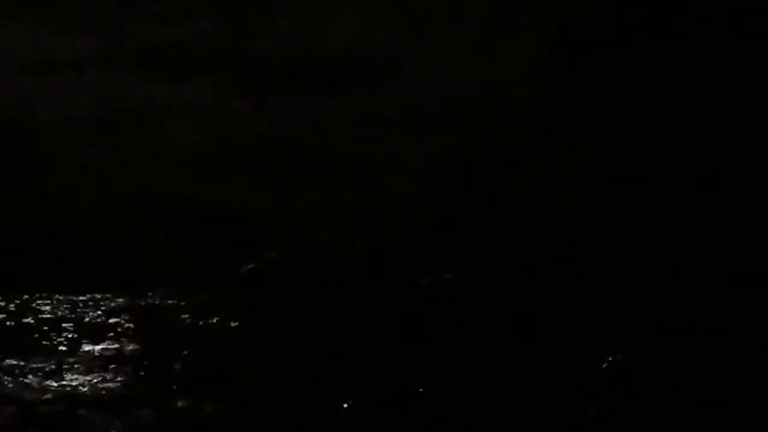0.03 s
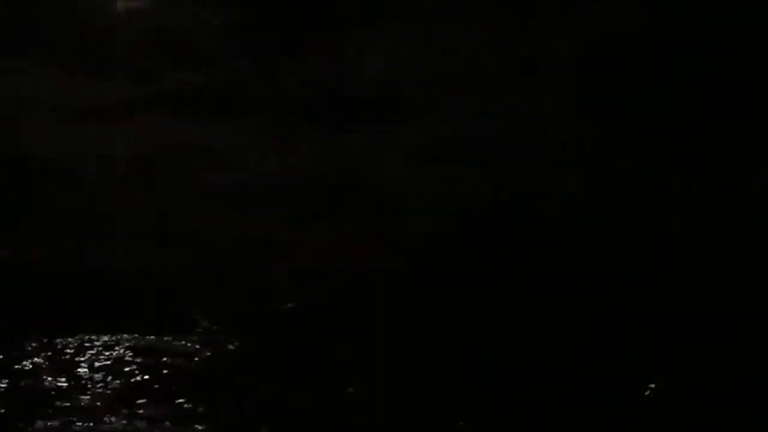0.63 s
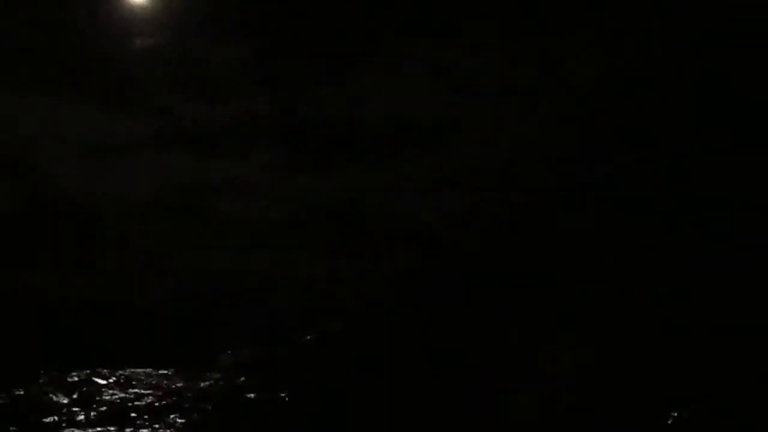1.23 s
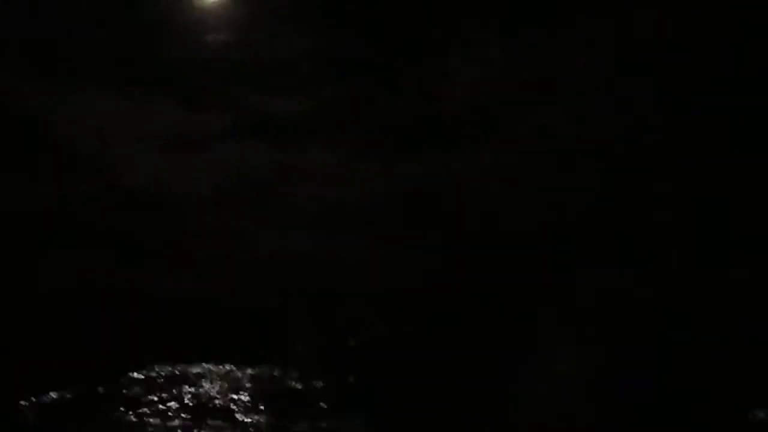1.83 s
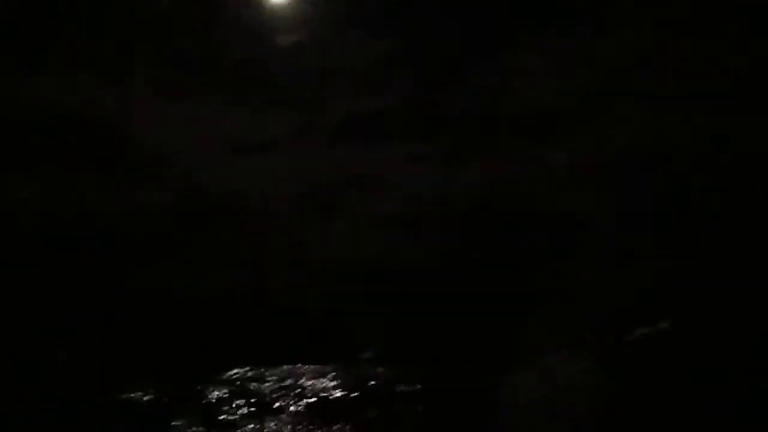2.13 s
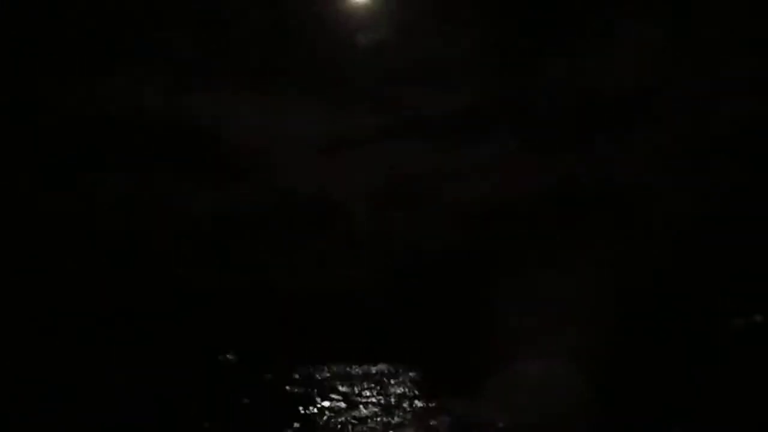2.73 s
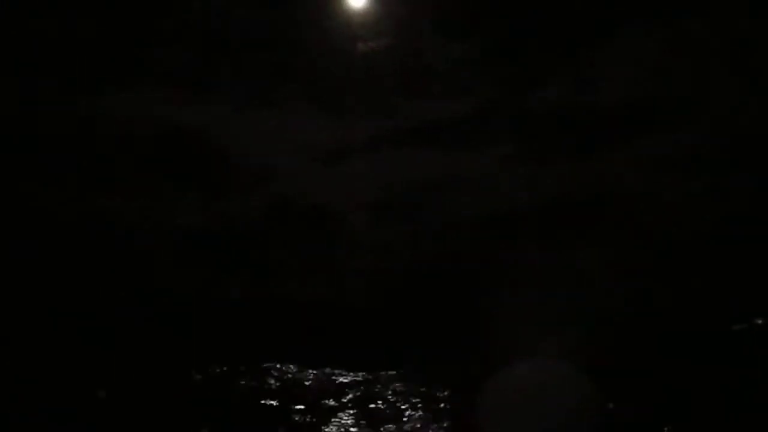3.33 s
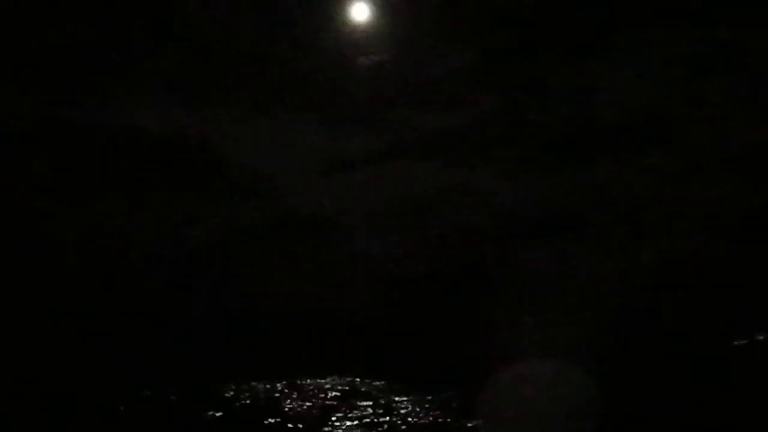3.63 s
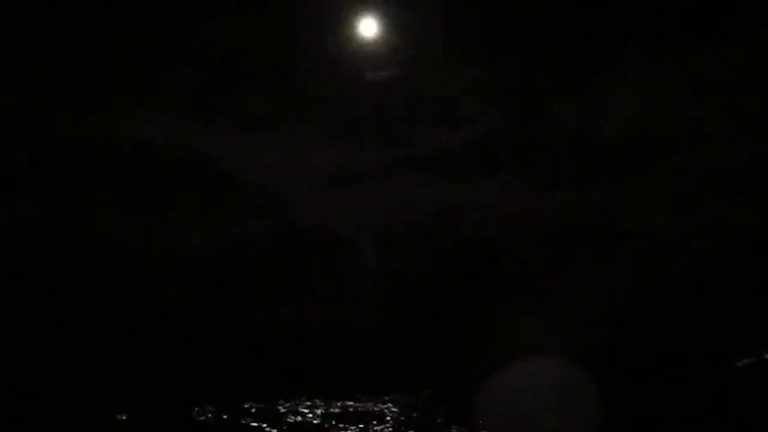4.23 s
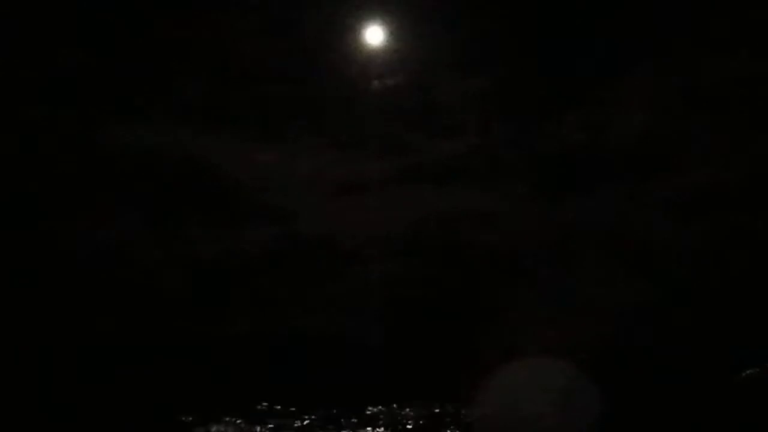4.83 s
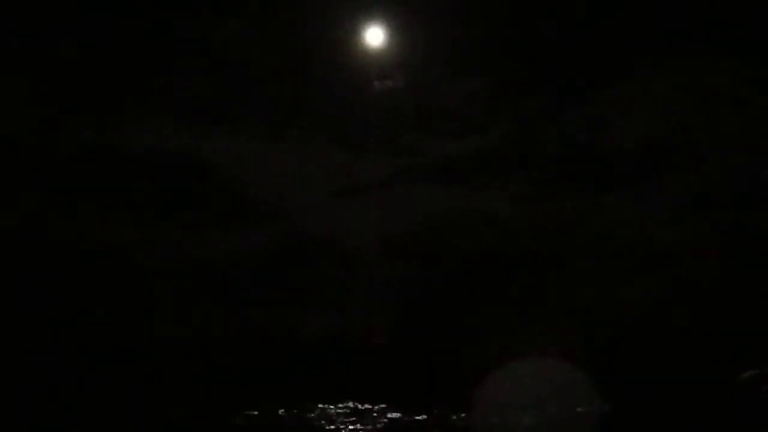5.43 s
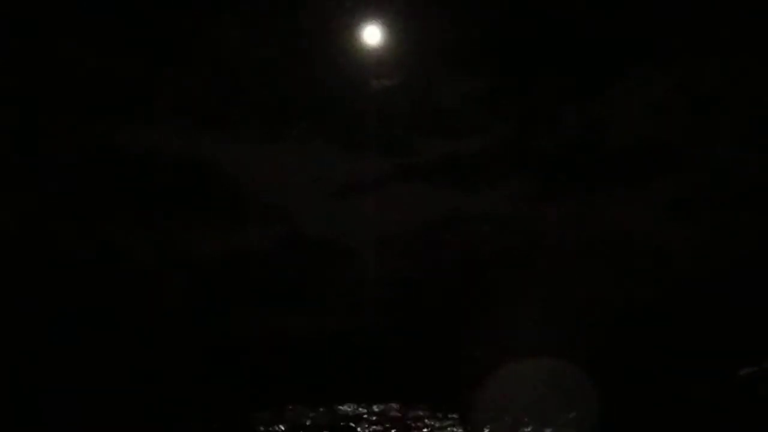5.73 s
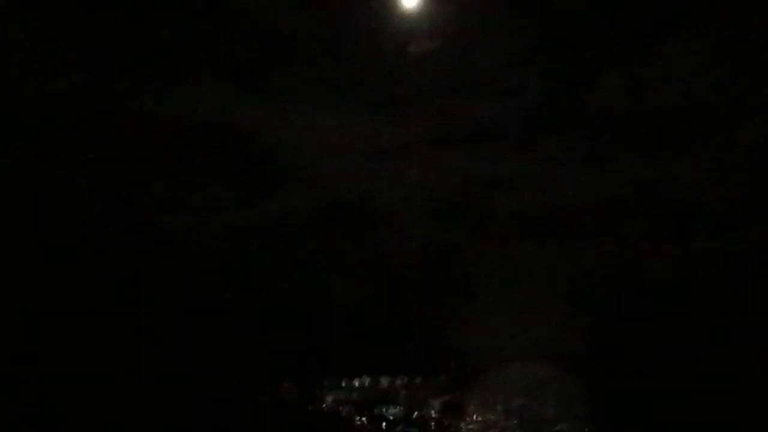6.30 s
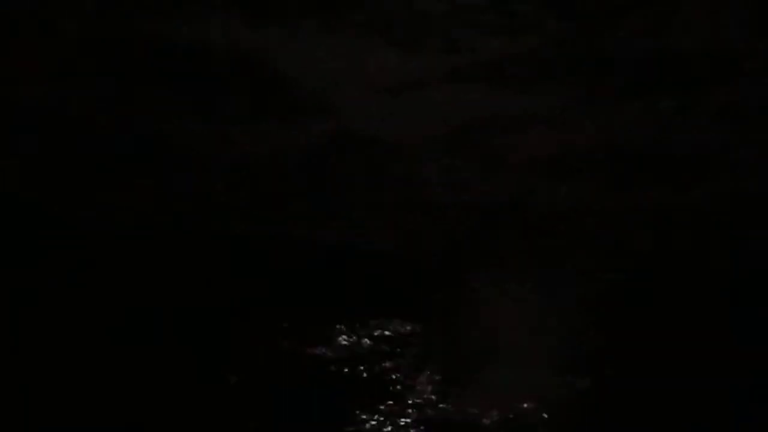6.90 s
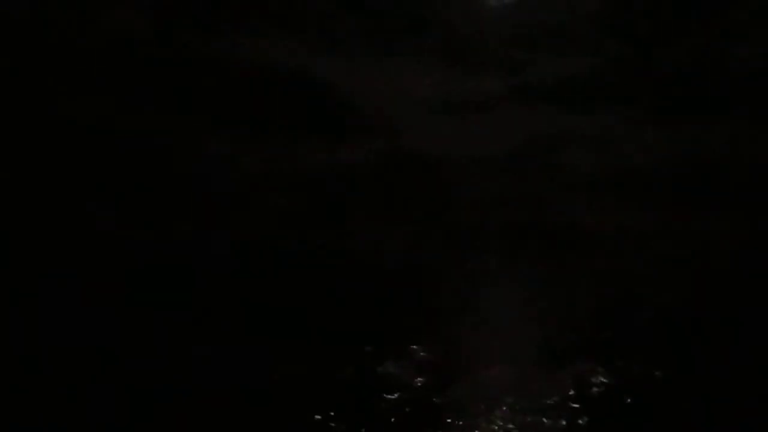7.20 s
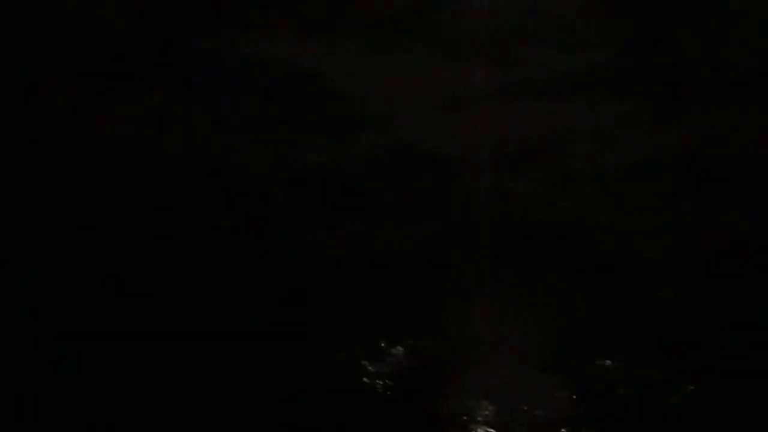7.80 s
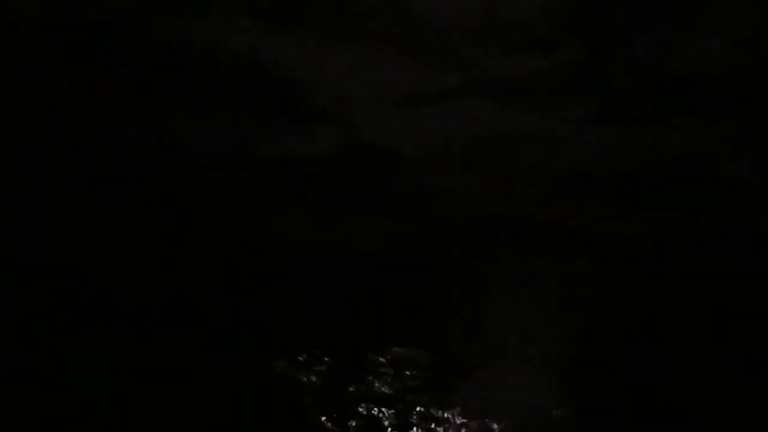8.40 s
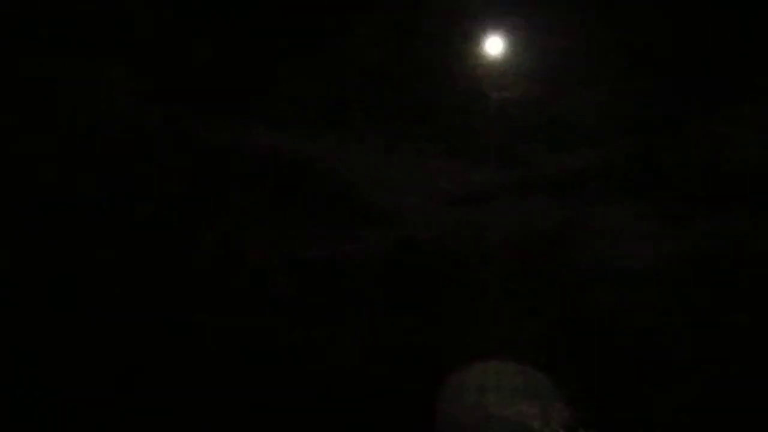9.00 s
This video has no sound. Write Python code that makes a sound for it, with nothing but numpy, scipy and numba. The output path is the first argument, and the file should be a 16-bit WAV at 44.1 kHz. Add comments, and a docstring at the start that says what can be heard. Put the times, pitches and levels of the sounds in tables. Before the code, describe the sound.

Close, gentle waves lap and wash on a seashore, bubbling and hissing over the low roar of distant surf. The wash eases, then a wave breaks with several sharp slaps and a churning gurgle. It drains off, and another wave rolls in with plops and spray, ending in a sustained foamy rush. The sound is near and out in the open, without echo.

```python
"""Small waves on a night shore

Waves run up a few steps away, with surf rumbling behind. One slaps down hard and drains away, the
next spills over in a long rush. The water sounds through its air: big pockets churn, bubbles
gurgle and plop, foam seethes and spray fizzes."""
import sys
import numpy as np
from scipy import signal
from scipy.fft import rfft, irfft, next_fast_len
from scipy.io import wavfile
from scipy.ndimage import uniform_filter1d, minimum_filter1d
from numba import njit

SR = 44100
rng = np.random.default_rng(int(sys.argv[2]) if len(sys.argv) > 2 else 0)


def dump_mix(stems):
    """Bounce the given channels to the path in sys.argv[1] as a 16-bit WAV at rate SR."""
    frames = np.atleast_2d(stems).T  # one column per channel
    limited = np.clip(frames, -1, 1)  # hard clip at full scale
    pcm = np.round(limited * 32767).astype(np.int16)
    wavfile.write(sys.argv[1], SR, pcm)


N = 403515
T = np.arange(N) / SR

# tone of the surf (low), gurgle (mid) and foam (high), including the microphone's resonance
# near 1410 Hz: (frequency [Hz], relative level [dB])
LOW_TONE = [(15, -19), (25, -26), (64, -26), (130, -17), (220, -13), (340, -8.5), (450, -7), (560, -5),
            (660, -6), (780, -10), (900, -14.5)]
MID_TONE = [(900, -11.5), (1040, -6), (1150, -6), (1290, -0.5), (1410, 2), (1620, -3), (1830, -2.5),
            (2080, -6.5), (2400, -13.5)]
HIGH_TONE = [(1800, -11), (2400, -14), (2900, -13), (3650, -12), (4800, -13.5), (5600, -17.5),
             (6600, -23.5), (7500, -23.5), (8400, -22), (9900, -22), (11400, -27), (12300, -28),
             (14300, -31), (15600, -42)]


def swash():
    """The running sheet of water gurgles, seethes and fizzes; each little tumble lifts all three."""
    gurgle_db = wave_swell("gurgle", calm_db=-34.5)
    foam_db = wave_swell("foam", calm_db=-38.5, linger=1.15)
    spray_db = wave_swell("spray", calm_db=-48, linger=1.36)
    tumble = 0.3 * wander(24) + 0.55 * wander(80)
    gurgle = bubble_cloud(911, 2448, count=7000, cycles=32, spread_db=2.5, blur_db=11.5)
    gurgle = colour(gurgle, MID_TONE, 720, 2280, order=20)
    foam = bubble_cloud(2190, 7030, count=8000, cycles=28.6, spread_db=3, blur_db=7.5)
    foam = colour(foam, HIGH_TONE, 2050, 6070)
    foam += undb(-10.5) * spatter(count=1400, spread_db=2.5)
    spray = bubble_cloud(5480, 16500, count=16000, cycles=14, spread_db=3.5, blur_db=2)
    spray = colour(spray, HIGH_TONE, 7320, 20000)
    return (gurgle * undb(gurgle_db + tumble + 0.58)
            + foam * undb(foam_db + 1.12 * tumble)
            + spray * undb(spray_db + 1.5 * tumble + 0.42 * wander(45) + 1.36))


def wave_swell(layer, calm_db, linger=1):
    """One layer's envelope in dB: waves swell, hold and drain; linger stretches rise and drain."""
    # waves and laps reaching the shore: (crest [s], base rise [s], hold [s], base drain [s],
    # gurgle [dB], churn [dB], foam [dB], spray [dB])
    waves = [(0.017, 0.18, .18, 0.73, -25.5, -34.5, -33, -37.5),
             (0.995, 0.99, 0.18, 1.7, -33, -38, -42.5, -39.5),
             (3.243, 0.2, .03, .3, -32.5, -41, -37.5, -50), (3.7, 0.42, 0.45, 0.094, -33, -39, -34.5, -51),
             (5.12, 0.043, 0.21, 0.54, -35, -51, -38, -54),
             (5.617, 0.057, 0.27, 0.17, -17.5, -25.5, -21, -30),
             (5.757, .03, 0.17, 0.1, -24, -22.5, -36, -44),
             (6.208, 0.069, 0.14, 0.14, -25.5, -37, -28.5, -37),
             (6.497, 0.11, 0.087, 0.17, -27, -47, -32.5, -41.5),
             (7.752, 0.26, 0.29, 0.28, -21, -36.5, -25, -32.5),
             (7.878, 0.032, .14, .09, -22, -38, -34, -46), (8.125, 0.085, .04, 0.15, -23, -32.5, -26, -38),
             (8.316, .05, 0.041, 0.23, -24, -38, -25, -41.5), (8.69, 0.36, 0.092, 2.9, -25, -49, -31, -40)]
    column = ("gurgle", "churn", "foam", "spray").index(layer)
    power = undb(calm_db) ** 2  # the wash that never stops between waves
    for crest, rise, hold, drain, *levels_db in waves:
        before = np.maximum(crest - T, 0) / rise
        after = np.maximum(T - crest - hold, 0) / drain
        swell = undb(levels_db[column]) * np.exp(-(before + after) / linger)
        power = power + swell ** 2
    return 10 * np.log10(power)


def slaps():
    """Sheets of water land: quick bursts of splashing, each with its own loudness, decay and brightness."""
    # sheets slapping down: (time [s], level [dB], decay [s], treble tilt [dB per octave])
    landings = [(0.02, -23, 0.027, -1), (0.155, -19.5, .025, -0.5), (1.722, -21.5, .024, -2.5),
                (2.882, -23, 0.018, 3), (3.952, -19.5, 0.02, 2.5), (4.863, -28, 0.011, 2.5),
                (5.088, -26, 0.013, 1), (5.135, -23, .004, 4), (5.482, -17.5, 0.019, 3),
                (5.603, -9, 0.0085, 1.5), (5.864, -1, 0.0044, 2), (5.925, 6.5, 0.0042, 2),
                (5.997, -16.5, 0.051, 1), (6.061, -7.5, 0.007, -1.5), (6.0723, 7, 0.0013, 6),
                (6.326, -22, 0.02, -7.5), (6.756, -22, 0.0028, 6.5), (7.474, -22, .02, -1),
                (8.145, -15, .006, 8), (8.424, -15, .003, 4)]
    out, t = np.zeros(N + SR), T[:SR // 4]
    splash_tone = sorted(LOW_TONE[:-1] + MID_TONE + HIGH_TONE[2:])
    attack = 1 - np.exp(-t / 0.00033)
    for start, db, decay, tilt_db in landings:
        burst = colour(rng.standard_normal(len(t)), splash_tone, 260, 14000, tilt_db, order=4)
        first = int(start * SR)
        out[first:first + len(t)] += burst * undb(db) * attack * np.exp(-t / decay)
    return signal.sosfilt(signal.butter(2, 170, "high", fs=SR, output="sos"), out[:N])


def plops():
    """Large bubbles ring out singly at the water's edge."""
    # close bubbles: (time [s], relative level [dB], pitch [Hz], ring length [cycles])
    bubbles = [(0.331, -7, 1690, 40), (0.687, -2, 1750, 17), (1.5977, -10, 1470, 31),
               (2.155, -13, 1440, 110), (2.349, -12.5, 2040, 41), (2.53, -8.5, 1450, 20),
               (2.574, -13.5, 2020, 77), (2.925, -22, 218, 13), (3.326, -13, 324, 14),
               (3.392, -12, 1510, 30), (4.106, -10.5, 1590, 71), (4.3255, -12, 1530, 71),
               (5.093, -16, 1230, 45), (5.229, -15, 1440, 32), (5.4967, -7, 1320, 46),
               (5.503, -7.5, 1940, 69), (5.575, -10.5, 470, 32), (5.61, -3, 1070, 67),
               (5.766, -3, 1280, 35), (5.767, -7.5, 528, 38), (5.813, 1.5, 520, 11), (5.838, -5, 541, 16),
               (5.901, -5.5, 560, 16), (5.929, -5, 1390, 35), (5.9656, -5, 1390, 47), (6.002, -1, 1390, 40),
               (6.0637, 3, 1310, 52), (6.083, -3.5, 593, 19), (6.329, -6, 1350, 27),
               (6.692, -5.5, 1440, 21), (7.174, -11, 1590, 35), (7.2735, -11.5, 1774, 63),
               (7.8034, 0.5, 1760, 52), (7.857, 0, 1500, 49), (7.895, -3.5, 1330, 56),
               (7.9622, -1, 1370, 24), (7.985, -2.5, 1750, 82), (7.99, -9, 765, 33), (7.991, -15, 400, 18),
               (8.1806, -4.5, 3520, 47)]
    start, db, hz, cycles = np.transpose(bubbles)
    return ring(start, undb(db - 2.5), hz, cycles, rise=0.057)


def drops():
    """Flung drops land close by with bright ticks."""
    # the nearest drops of spray: (time [s], relative level [dB], pitch [Hz])
    ticks = [(0.1052, -13, 4700), (0.155, -18, 3000), (0.274, -14, 2680), (0.45, -17, 8260),
             (0.924, -16, 3920), (3.264, -15, 4700), (3.554, -19, 8300), (3.77, -16, 4310),
             (5.5725, -13, 10200), (6.151, -12, 9100), (6.5894, -15, 5170), (7.75, -11, 2670),
             (7.761, -11, 4900), (7.7836, -8.5, 4680), (8.097, -10, 4430), (8.229, -12.5, 3200),
             (8.9022, -18, 7560)]
    start, db, hz = np.transpose(ticks)
    return ring(start, undb(db + 7), hz, cycles=np.full(len(start), 16.), rise=0.069)


def spatter(count, spread_db):
    """Drops strike the water at random, each with one sharp tick; a few land close."""
    when, luck = rng.random((count, 2)).T
    size = undb(-spread_db * np.log(luck + .01))
    ticks = np.bincount((when * N).astype(int), size, N)
    return colour(ticks - ticks.mean(), HIGH_TONE, 1600, 15000, order=6)


def surf():
    """Big air pockets churn in the breakers, over the roar and rumble of the surf further out."""
    # the far roar, ducked by the recorder's gain control after the big wave:
    # (time [s], relative level [dB])
    roar_levels = [(0, -44), (2.3, -47), (3.7, -43.5), (4.9, -44), (5.85, -39.5), (6.55, -51), (7.2, -53),
                   (8.3, -46.5), (9.14, -45)]
    # the deep rumble beneath it: (time [s], relative level [dB])
    rumble_levels = [(0, -55.5), (1.7, -57), (4.1, -58), (5.9, -57.5), (6.2, -70), (6.7, -66.5),
                     (7.8, -55.5), (9.14, -55)]
    roar_db = np.interp(T, *np.transpose(roar_levels))
    rumble_db = np.interp(T, *np.transpose(rumble_levels))
    far_churn_db = -35 + 0.56 * (roar_db + 45)  # far breakers churn along with the roar
    churn_db = wave_swell("churn", calm_db=far_churn_db, linger=0.62)
    churn = bubble_cloud(265.3, 974, count=6000, cycles=19.6, spread_db=0.94, blur_db=6.5)
    churn = colour(churn, LOW_TONE, 317, 910, order=20)
    roar = colour(rng.standard_normal(N), LOW_TONE, 117, 356)
    rumble = colour(rng.standard_normal(N), LOW_TONE, 14, 109)
    return (churn * undb(churn_db + 0.11 * wander(21) - 0.93)
            + roar * undb(roar_db + 0.85 * wander(9) + 3)
            + rumble * undb(rumble_db + 3.1 * wander(9) + 0.5))


def thuds():
    """Short dull thuds under the wash, each a few cycles of a deep tone."""
    # low thuds: (time [s], relative level [dB], pitch [Hz], ring length [cycles])
    bumps = [(3.0, -33, 37.8, 5.1), (5.8, -31, 45, 4), (5.92, -32, 45, 4)]
    start, db, hz, cycles = np.transpose(bumps)
    return ring(start, undb(db + 2), hz, cycles, rise=0.25)


def bubble_cloud(lo_hz, hi_hz, count, cycles, spread_db, blur_db):
    """Many faint bubbles and a few loud ones, over the blur of those too far off to tell apart."""
    when, pitch, luck, sustain = rng.random((count, 4)).T
    hz = np.minimum(lo_hz * (hi_hz / lo_hz) ** pitch, .45 * SR)
    strength = -np.log(luck + .004)
    # small bubbles die sooner, so they must ring harder to fill their band
    size = undb(spread_db * strength) * (hz / lo_hz)
    bubbles = ring(when * N / SR, size, hz, cycles * (.5 + sustain), rise=0.33)
    return unit(bubbles) + undb(blur_db) * rng.standard_normal(N)


@njit
def ring(start, size, hz, cycles, rise):
    """Each bubble swells in one cycle and falls 60 dB over its cycles, rising in pitch as it surfaces."""
    out = np.zeros(N)
    for k in range(len(start)):
        first, life = int(start[k] * SR), int(cycles[k] / hz[k] * SR) + 1
        phasor, step = size[k] + 0j, 2 * np.pi * hz[k] / SR
        turn = np.exp(1j * step - np.log(1000) / life)
        glide = np.exp(1j * step * rise / life)  # rise is a fraction of the starting pitch
        for i in range(max(first, 0), min(first + life, N)):
            out[i] += phasor.imag * min((i - first) * hz[k] / SR, 1.)
            phasor *= turn
            turn *= glide
    return out


def colour(x, tone, lo_hz, hi_hz, tilt_db=0, order=12):
    """Shape by a tone curve and a tilt per octave, between two steep band edges; rms 1."""
    size = next_fast_len(len(x))
    f = np.maximum(np.fft.rfftfreq(size, 1 / SR), 1)
    hz, db = np.transpose(tone)
    gain = undb(np.interp(np.log(f), np.log(hz), db) + tilt_db * np.log2(f))
    edges = np.sqrt((1 + (lo_hz / f) ** order) * (1 + (f / hi_hz) ** order))
    return unit(irfft(rfft(x, size) * gain / edges, size)[:len(x)])


def wander(rate_hz):
    """Smooth random drift: held steps, slewed twice; rms 1."""
    hold = max(int(SR / rate_hz), 1)
    steps = np.repeat(rng.standard_normal(N // hold + 1), hold)
    return unit(uniform_filter1d(uniform_filter1d(steps, hold), hold)[:N])


def undb(db):
    """Decibels to gain."""
    return 10 ** (np.asarray(db) / 20)


def unit(x):
    """Scale to rms 1."""
    return x / np.sqrt(np.mean(x ** 2))


def scene():
    """Open shore in mono, no echo."""
    return (surf() + swash() + slaps() + plops() + drops() + thuds())[None]


def record(dry):
    """The microphone port hollows the treble, a fast limiter holds loud splashes, and the top is cut."""
    # hollows in the microphone's response: (centre [Hz], width [Hz], depth [0-1])
    notches = [(7865, 310, 1), (13200, 980, 0.7)]
    ceiling, top_hz = 0.74, 15750
    x = dry
    for hz, width, depth in notches:
        hollow = signal.lfilter(*signal.iirpeak(hz, hz / width, fs=SR), x)
        x = x - depth * hollow
    gain = minimum_filter1d(ceiling / np.maximum(np.abs(x), ceiling), size=65)
    x = x * uniform_filter1d(gain, size=65)
    return signal.sosfilt(signal.ellip(10, .2, 80, top_hz, fs=SR, output="sos"), x)


dry = scene()
out = record(dry)
dump_mix(out)
```